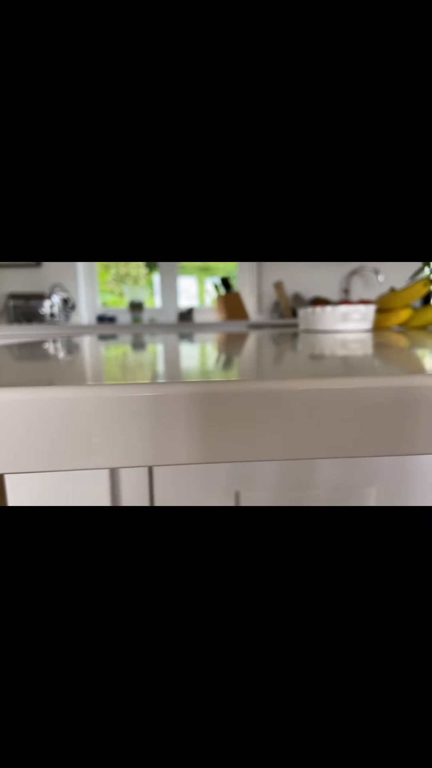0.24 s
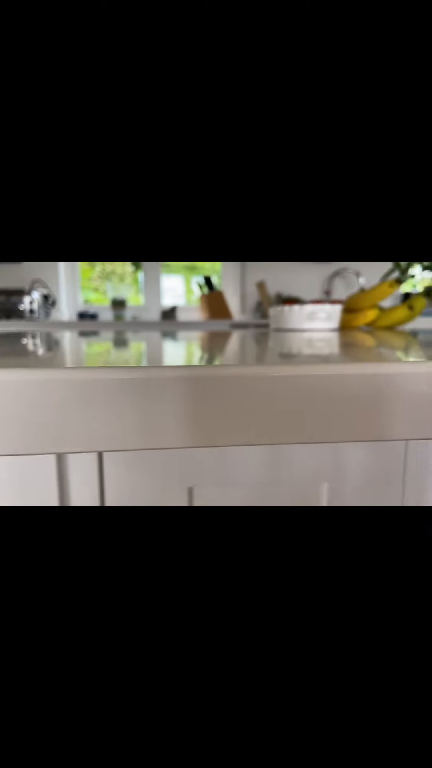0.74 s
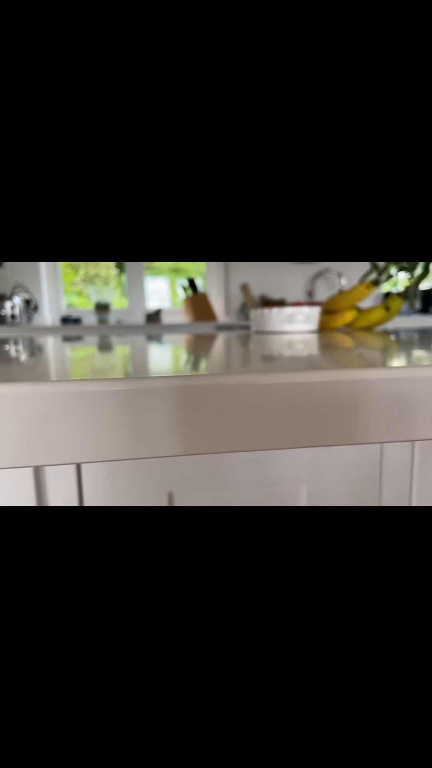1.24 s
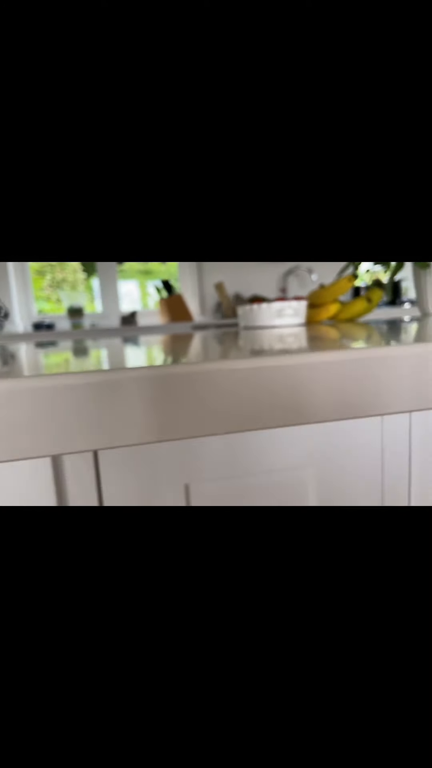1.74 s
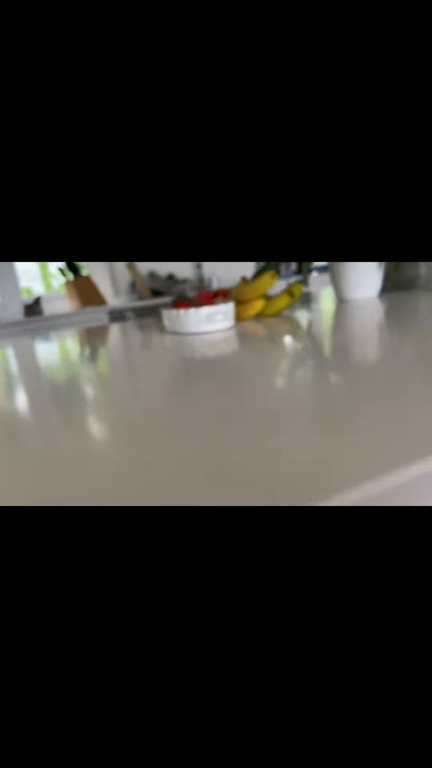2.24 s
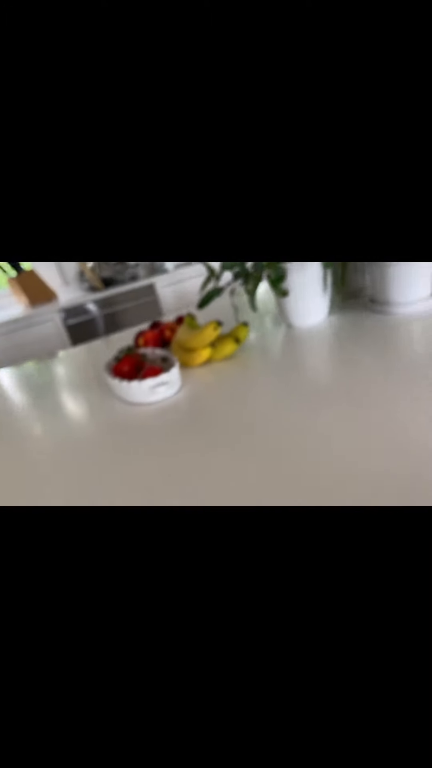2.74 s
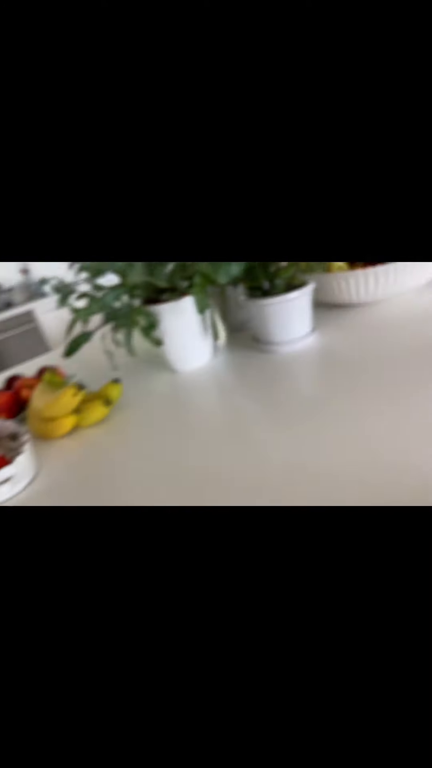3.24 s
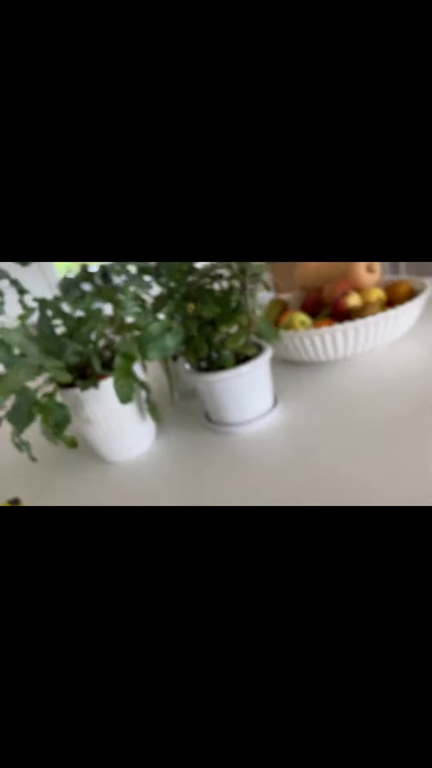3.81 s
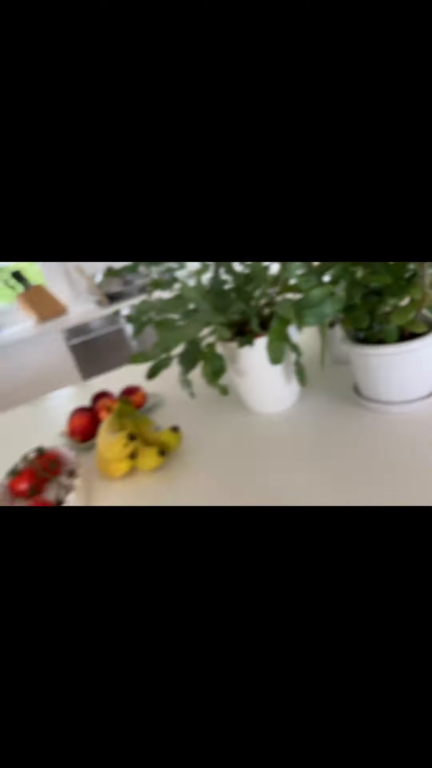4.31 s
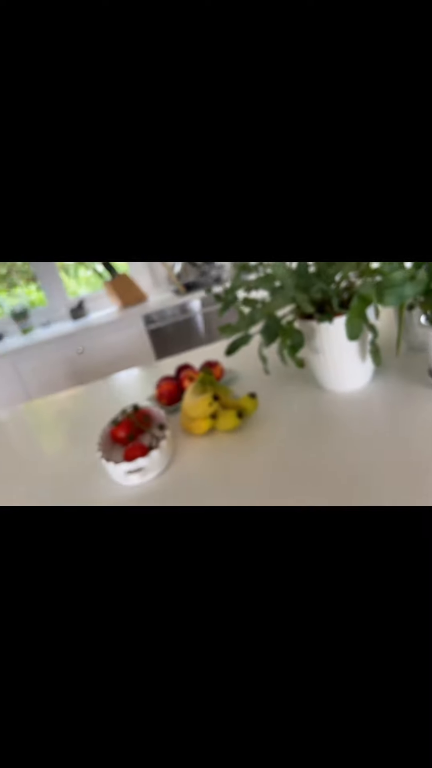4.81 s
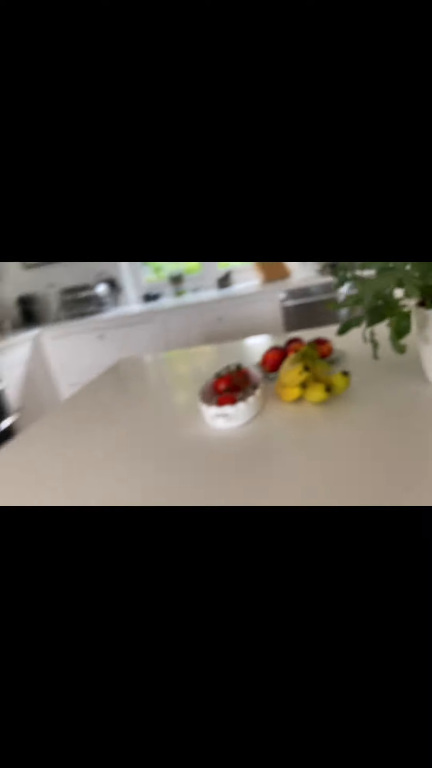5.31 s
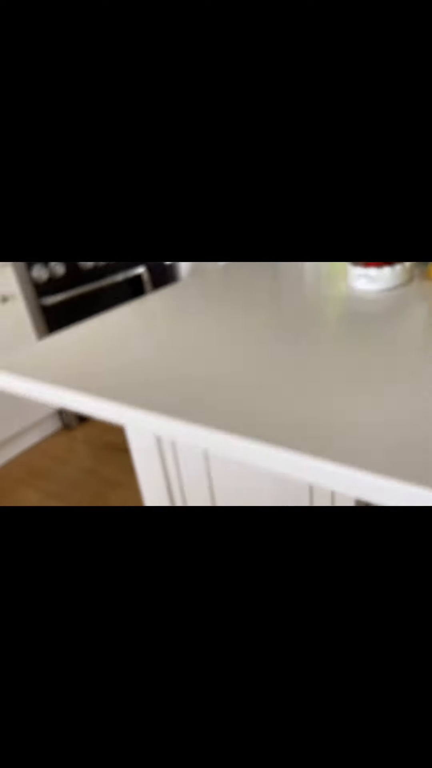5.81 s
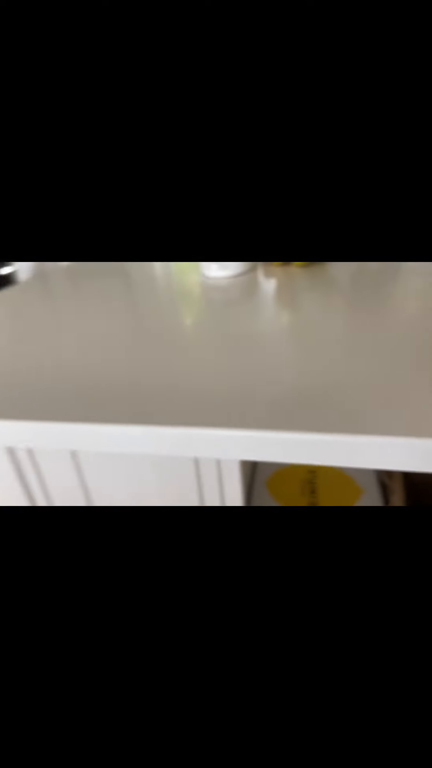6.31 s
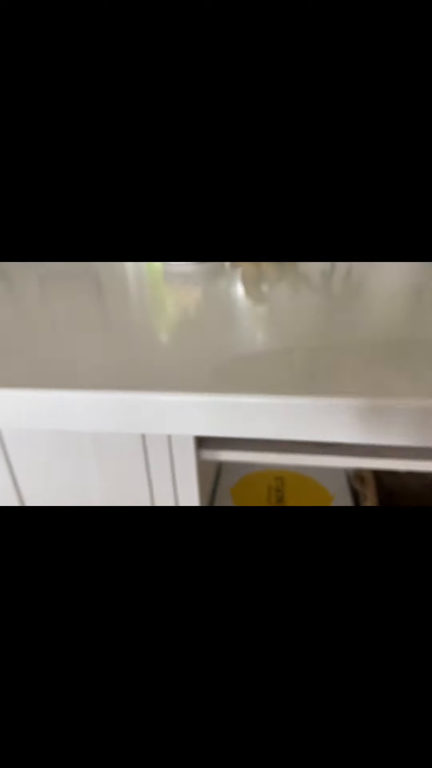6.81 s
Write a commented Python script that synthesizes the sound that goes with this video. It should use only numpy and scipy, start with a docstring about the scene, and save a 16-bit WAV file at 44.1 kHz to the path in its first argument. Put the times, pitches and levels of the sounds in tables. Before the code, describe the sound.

A steady, bright cloth hiss swells over a smooth counter, stops, and gives way to scuffs and a rapid run of hollow clicks. Further wipes are quieter and duller, with scattered wooden thumps ringing below. A light dragging noise leads to a cluster of hard bangs, the loudest moment, then wiping returns. Low rumble and quiet room air lie behind, picked up close on a phone in a reverberant kitchen.

```python
"""A cloth is wiped in long strokes over a stone worktop, close to a hand-held phone in a hard-walled kitchen.
The wipe is noise shaped by cloth, hand and pressure; short scuffs fall around the strokes.
Something small and hollow taps the stone and duller knocks ring the cabinets below: both are decaying
modes, followed by the room's reflections. A cabinet scrape, low rumble and still air lie behind.
The phone's two microphone ports hear the highest treble nearly as one sound, the left port a little late."""
import sys
import numpy as np
from scipy import signal
from scipy.fft import rfft, irfft, next_fast_len
from scipy.io import wavfile
from scipy.ndimage import uniform_filter1d

SR = 44100
rng = np.random.default_rng(int(sys.argv[2]) if len(sys.argv) > 2 else 0)


def store_pcm(level_fs):
    """Save levels as 16-bit WAV."""
    pcm = np.round(np.clip(level_fs, -1, 1) * 32767).astype(np.int16)
    wavfile.write(sys.argv[1], SR, np.atleast_2d(pcm).T)


N = 311331  # samples
HOP, SIZE = 128, 512  # noise frames, samples
HZ = np.fft.rfftfreq(SIZE, 1 / SR)[:, None]
TIMES = np.arange(N // HOP + 5) * HOP / SR
LONG = next_fast_len(N)
BINS = np.fft.rfftfreq(LONG, 1 / SR)

# Colour of the cloth on stone: (frequency [Hz], level per Hz [dB])
CLOTH_COLOUR = [(150, -15), (400, -11.5), (800, -12), (1400, -2), (2200, 3.5), (4500, 0.5), (6000, 0),
                (9000, -7), (12000, -3.5), (16000, -13.5)]
# One table a stroke: (time [s], pressure level [dB], low mids [dB], low treble [dB], top [dB], left-port lag [ms])
STROKES = [
    [(0.0, -42.5, 1.5, -6.5, -7, 0.22), (0.474, -41.5, -1, -4.5, -2, 0.23), (0.9, -41.5, 1, -6.5, -8, 0.24),
     (1.25, -38.5, -4.5, -9, -8, 0.27), (1.44, -38, -10.5, -10.5, -9, 0.3), (1.52, -43, -11, -12, 3, 0.3)],
    [(2.36, -44, 15, -4.5, 0, 0.24), (2.54, -41, 14.5, -6.5, -4, 0.25), (2.6, -44.5, 14.5, -6.5, -6, 0.24),
     (2.706, -39, 9.5, -6, -4, 0.23), (2.924, -46.5, 15, -1, 10, 0.23), (3.546, -48.5, 15.5, 0.5, 11, .23),
     (3.784, -43, 13, -5.5, 4, 0.26), (3.986, -48.5, 13.5, -5.5, 4, 0.3), (4.17, -59, 7.5, -6.5, 5, 0.33)],
    [(4.5, -46, 6.5, -13, -1, 0.33), (4.638, -44, -0.5, -6.5, 5, 0.29), (4.916, -47, -2, -10.5, 7, 0.21),
     (5.1, -51.5, -17, 1, 10, 0.23), (5.344, -49.5, -20, -0.5, 7, 0.33), (5.52, -51, 18, -13, -3, 0.32),
     (5.584, -57.5, 5, -5.5, -2, 0.23), (5.68, -52, -1, -12.5, 6, 0.39), (6.094, -45, 0.5, -7, 0, 0.27),
     (6.17, -47, -3, -7.5, -2, 0.24)],
    [(6.92, -43.5, -11, -10.5, -6, 0.27), (7.04, -39.5, -1, -9.5, -11, 0.28),
     (7.06, -42, 8, -13, -2.5, 0.23)],
]
# How fast each stroke swells in: (rise [dB/s]) for each stroke
LANDING_DB_PER_S = [311, 306, 1500, 310]
LIFT_DB_PER_S = 250  # and how fast it dies away
# How far the hand cups the cloth: (depth [dB]) for each stroke
CUPPING_DB = [4.8, 2.4, 1.3, 3.3]
# Resonances of the air under the hand: (frequency [Hz], width [Hz], share of the cupping [ratio])
HAND_AIR = [(1940, 104, 1.2), (3200, 700, 1.02), (4760, 630, 0.96), (6530, 1070, 0.8), (7830, 440, 0.75),
            (9900, 270, 0.47)]
# Bands of hiss that stand out and glide:
# (start [s], end [s], from [Hz], to [Hz], level [dB], width [octaves])
SWISHES = [(0.203, 1.5, 4850, 3800, 1.5, 0.15), (2.593, 3.188, 4000, 4200, 3.5, 0.19),
           (3.19, 3.997, 4160, 3900, 7, 0.21), (4.06, 4.132, 2800, 3100, 6, .3),
           (4.467, 4.897, 2600, 4700, 3.5, .4)]
# The cloth is set down or shifted: (time [s], level [dB], low mids [dB], low treble [dB], fade [dB/s])
SCUFFS = [(1.535, -44, 15.5, -7, 173), (1.83, -57, 5, -7, 18), (1.875, -59.5, 24, -10, 14),
          (1.911, -42.5, 14.5, -7.5, 118), (2.065, -45.5, 22.5, -9, 200), (2.113, -43, -1, -6.5, 109),
          (2.202, -43.5, 18.5, -16.5, 127), (4.235, -52.5, 23.5, -13.5, 57), (6.281, -63, 17, 7, 134),
          (6.396, -55, 8, 1, 186), (6.491, -47, 22.5, 5.5, 80), (6.653, -54, 39, -1.5, 27)]
SCUFF_RISE_DB_PER_S, SCUFF_TOP_DB = 2000, -7.5
# How far the hiss comes from one direction: (time [s], share [0-1])
FOCUS = [(0.5, 0.04), (0.9, 0.45), (1.1, 0.95), (1.46, 0.95), (1.56, 0.09), (7.06, 0.23)]
LOW_MIDS_HZ, LOW_TREBLE_HZ, TOP_HZ = 487, 2900, 17300  # centres of the parts of the wipe
FIZZ_HZ, FIZZ_DB, FIZZ_GIVES = 10400, 1.24, 0.04  # the fizz sinks as the low treble grows (dB per dB)

# Taps on the stone: (time [s], level [dB], brightness [dB/octave], nominal main ring [Hz], left over right [dB])
TAPS = [(1.053, -43.5, 0.5, 870, 0), (1.263, -46, 3, 920, 0), (1.317, -45, 1, 830, 2),
        (1.535, -31, 5.5, 790, 7), (1.5375, -32.5, -0.5, 890, 3), (1.545, -40.5, -8.5, 850, -2),
        (1.912, -29, 0.5, 760, 9.5), (1.988, -44, 7, 750, 3), (2.056, -38, 7, 756, 9),
        (2.064, -26, -0.5, 720, 6), (2.0685, -28, -2.5, 744, 0), (2.102, -40, 0, 750, 6),
        (2.1095, -28, -2.5, 724, 3), (2.165, -41, 2, 746, 3), (2.2, -31.5, 0, 765, 4),
        (2.327, -33, 0, 750, 3), (2.353, -33, -6, 754, 1), (2.397, -30.5, -2.5, 770, 0),
        (2.415, -37, 1, 880, 2), (2.436, -28.5, -1.5, 790, 2), (2.474, -35, -0.5, 680, -5),
        (2.5, -34, 0, 820, -4), (2.523, -37, -10, 865, -2), (2.544, -35, 0, 750, -3),
        (2.555, -30.5, 0.5, 645, -2), (2.613, -42.5, -2, 690, -2), (2.7364, -30.5, -2.5, 780, -7),
        (4.181, -48, 11, 750, 2), (4.23, -45, -5.5, 980, -2), (4.498, -47.5, 0, 740, 0)]
# Nominal modes of the small hollow thing: (frequency [Hz], level [dB], t60 [s])
HOLLOW_MODES = [(300, -24, 0.055), (765, 6.5, 0.01), (1710, -3, 0.0085), (2400, -4, 0.0094),
                (3160, -16, 0.0083), (4000, -5.5, 0.0073), (5340, -8, 0.0059), (7420, -5, 0.0032),
                (12100, -4, 0.00092)]
# Each contact: its first instant against the rough rest, its smooth push, and cycles a mode takes to build up
TAP_SNAP, TAP_PUSH, TAP_SWELL = 1.75, 1.2, 1.5
KNOCK_SNAP, KNOCK_PUSH, KNOCK_SWELL = 0.9, 0.11, 0.15

# Knocks: (time [s], level [dB], lowest strong mode [Hz], softness corner [Hz], slope between [dB/octave],
#          direct share [dB], ring length [ratio], left over right [dB])
KNOCKS = [(1.055, -54.5, 248, 500, 5, 0, 1.3, 5), (1.322, -54.5, 248, 450, 9, 2, 0.95, 0),
          (1.542, -49, 315, 600, 13, 5, 0.76, 0), (1.556, -45, 389, 606, 10, 1, 1.4, -2),
          (2.201, -42.5, 248, 500, 17, -2, 0.93, 1), (2.342, -40, 248, 450, 30, 0, 0.88, 1),
          (3.044, -37, 236, 1330, 31, 1.5, 1, -1), (3.127, -45.5, 232, 1040, 17, 7.5, 1, 2),
          (3.68, -31, 316, 900, 7, -7, 0.62, -11), (3.688, -31, 500, 1400, 10.5, -4.5, 1, 13),
          (3.775, -34.5, 347, 696, 9, -2, 0.61, 0), (3.781, -50, 107, 300, 13, 8, 0.7, -5),
          (3.798, -37, 167, 500, 7, -1, 0.46, 0), (4.004, -43, 389, 800, 7, -7, 0.74, -8),
          (4.235, -44.5, 400, 1200, 8, -13, 0.67, -6), (4.538, -47.5, 56.3, 147, 10, 11, 0.97, 2),
          (5.116, -38.5, 199, 905, 5.5, -13, 0.72, -10), (5.143, -29, 400, 1400, 6.5, -10, 0.9, -10),
          (5.152, -45, 125, 300, 18, 6, 0.88, -2), (5.255, -31.5, 300, 3320, 2.5, -2, 0.68, 5),
          (5.443, -45, 186, 1298, 6.5, -5, 1.3, 6), (5.516, -45, 394, 724, 9, -1, 0.75, 0),
          (5.53, -39.5, 690, 3500, 1, 1.5, 0.92, 0), (5.863, -48.5, 260, 1340, 5, -4, 0.53, 0),
          (6.054, -41.5, 550, 4000, 19, -2.5, 1.2, 0), (6.0945, -40.5, 530, 6000, 5, 4, 0.86, 5),
          (6.138, -42, 1050, 2500, 13, 4, 0.75, 1), (6.282, -45.5, 3800, 8000, -3, 7.5, 1.3, 8),
          (6.396, -42.5, 570, 5000, 7, 2.5, 1.4, 2), (6.428, -38.5, 700, 5030, 6.5, -0.5, 0.84, 0),
          (6.478, -38, 785, 4000, 5, 2.5, 0.74, -2), (6.485, -30, 389, 4800, 22, 1.5, 1.33, -8),
          (6.5712, -24.5, 389, 1500, 14.5, 2.5, 2.5, -8), (6.581, -34, 158, 350, 15, 7.5, 0.81, 1),
          (6.653, -27, 389, 905, 28, 0.5, 4.2, 3), (6.668, -32.5, 389, 810, 23, 5, 2, -3),
          (6.679, -17, 1200, 6000, 5.5, 4, 1.3, 2.5), (6.683, -27.5, 2400, 6500, 8, 7.5, 1.3, 5),
          (6.687, -31, 2600, 6000, 0, -2, 1.5, 2), (6.688, -28.5, 389, 794, 9.5, 6, 6.6, -7.5)]
# Nominal modes of the cabinets below the worktop: (frequency [Hz], level [dB], usual t60 [s])
CABINET_MODES = [(56, 5.5, 0.051), (79.2, -12.5, 0.051), (107, -5, 0.067), (158, -7.5, 0.13),
                 (248, -3, 0.052), (307, -0.5, 0.049), (389, 9.5, 0.013), (570, 13.5, 0.013),
                 (732, 18, 0.0082), (890, 17, 0.014), (1083, 21, 0.0065), (1150, 10, 0.0031),
                 (1286, 18, 0.0032), (1720, 26.5, 0.0024), (1990, 6, 0.0078), (2650, 19.5, 0.0035),
                 (3170, 0, 0.0031), (3730, 8.5, 0.005), (4700, 12.5, 0.0019), (5600, -12, 0.0021),
                 (6910, -4, .002)]
BELOW_DB = 15  # modes under the lowest strong one sink so many dB per octave
CONTACT_S, CONTACT_AT_HZ, CONTACT_LAW = 0.00082, 1310, 0.45  # contact shortens as the corner rises

# Decay of the hard-walled kitchen: (frequency [Hz], t60 [s])
KITCHEN_DECAY = [(60, 0.71), (250, 0.59), (1000, 0.5), (3000, 0.47), (8000, 0.22), (16000, 0.37)]
TAP_ROOM_DB, KNOCK_ROOM_DB = -8, 1  # share that fills the room

# Something drags in a cabinet: (time [s], level [dB])
SCRAPE_LEVEL = [(6.06, -64), (6.106, -52), (6.23, -52), (6.471, -53)]
# Colour of the drag: (frequency [Hz], level per Hz [dB])
SCRAPE_COLOUR = [(150, 3.5), (400, 6.5), (1000, -2.5), (1450, -1), (1900, -1), (2400, -7.5), (3200, -14),
                 (6000, -41)]
# Low rumble through floor and hand: (time [s], level [dB])
RUMBLE_LEVEL = [(0, -67.5), (1.8, -65.5), (2.4, -57.5), (3.3, -64.5), (4.0, -63), (5.0, -64), (5.75, -65),
                (6.15, -64), (7.06, -52.5)]
# Colour of the rumble: (frequency [Hz], level per Hz [dB])
RUMBLE_COLOUR = [(12, -29), (20, -1.5), (42, -3.5), (64, -1), (92, -3.5), (145, -9), (245, -9), (400, -18),
                 (520, -59), (880, -120)]
# The rumble swells as weight shifts on the floor: (peak time [s], level [dB])
THUDS = [(0.25, -58), (1.551, -56), (2.1, -52), (2.37, -78), (3.13, -50), (3.79, -48), (4.302, -48),
         (4.55, -60), (5.15, -54), (5.51, -51.5), (5.88, -57), (6.495, -46), (6.59, -42), (6.682, -32.5)]
THUD_RISE_DB_PER_S, THUD_FALL_DB_PER_S = 598, 181
# Colour of the still room: (frequency [Hz], level per Hz [dB])
AIR_COLOUR = [(20, -32), (60, -19), (120, -10), (300, -21), (1000, -25.5), (4000, -26), (16000, -31.5)]
AIR_DB = -65

# Likeness of the noise at the two ports: (frequency [Hz], likeness [0-1])
PORT_LIKENESS = [(60, 1), (150, 0.99), (300, 0.18), (1000, 0.073), (2000, 0.36), (3000, 0.19), (4000, 1),
                 (5000, 0.15), (6000, 0.02), (7000, 0.95), (9000, 1)]
# Balance of the two ports: (frequency [Hz], left over right [dB])
PORT_BALANCE = [(60, 0), (150, 0.5), (380, -1), (950, -1), (2380, 2.5), (5980, 0), (15000, -0.5)]
TREBLE_LAG_MS, TREBLE_HZ = 0.2768, 5640  # left-port lag in the treble, and where the treble begins
TAP_LAG_MS, BLOW_LAG_MS = 0.22, 0.077  # left-port lag below it: for the taps, and for the rest, which comes nearly from ahead
EDGE_HZ = 15800  # upper band limit


def cloth():
    """Countless fibres slip on the stone: long strokes under a cupped hand, and short scuffs."""
    s, *columns = np.concatenate(STROKES).T
    *levels_db, lag_ms = (np.interp(TIMES, s, column) for column in columns)
    power = colour(*levels_db) * gain_of(stroke_ends_db() + cupped_hand_db(s) + swishes_db()) ** 2
    power = power + scuffs()
    level_db = unit(CLOTH_COLOUR) + 10 * np.log10(power + 1e-20) + unevenness_db()
    focus = np.interp(TIMES, *np.transpose(FOCUS))
    return noise(level_db, lag_of(HZ, lag_ms), focus)


def colour(pressure_db, low_mids_db, low_treble_db, top_db):
    """Power of the wipe over frequency and time: broad bells and a narrow fizz around the pressure level."""
    db = pressure_db + low_mids_db * near(LOW_MIDS_HZ, 1.575)
    db = db + low_treble_db * near(LOW_TREBLE_HZ, 1.0)
    db = db + top_db * near(TOP_HZ, 0.34)
    fizz_db = FIZZ_DB - FIZZ_GIVES * low_treble_db
    return gain_of(db + fizz_db * near(FIZZ_HZ, 0.043)) ** 2


def stroke_ends_db():
    """Each stroke swells in as the cloth lands and dies away as it lifts."""
    ends_db = [slopes(TIMES, rows[0][0], rows[-1][0], land_db, LIFT_DB_PER_S)
               for rows, land_db in zip(STROKES, LANDING_DB_PER_S)]
    return np.max(ends_db, axis=0)


def cupped_hand_db(s):
    """Air trapped under the hand resonates, as deep as the hand cups the cloth."""
    depth_db = np.repeat(CUPPING_DB, [len(rows) for rows in STROKES])
    resonance = sum(share / (1 + (2 * (HZ - hz) / width_hz) ** 2) for hz, width_hz, share in HAND_AIR)
    return np.interp(TIMES, s, depth_db) * resonance


def swishes_db():
    """A band of the hiss rises, glides in frequency and sinks again."""
    total_db = 0
    for start, end, from_hz, to_hz, db, octaves in SWISHES:
        u = np.clip((TIMES - start) / (end - start), 0, 1)
        arch = np.sqrt(abs(np.sin(np.pi * u)))
        total_db = total_db + db * arch * near(from_hz + (to_hz - from_hz) * u, octaves)
    return total_db


def scuffs():
    """Power of brief slips of the cloth, each with a quick rise and its own fade."""
    power = 0
    for s, db, low_mids_db, low_treble_db, fade_db in SCUFFS:
        envelope = gain_of(slopes(TIMES, s, s, SCUFF_RISE_DB_PER_S, fade_db))
        power = power + colour(db, low_mids_db, low_treble_db, SCUFF_TOP_DB) * envelope ** 2
    return power


def unevenness_db():
    """The hiss varies in slower patches of frequency and time and in a quick, broad flicker."""
    patches, flicker = rng.standard_normal((len(TIMES), len(HZ), 2)).T
    patches = uniform_filter1d(uniform_filter1d(patches, size=6, axis=0), size=20, axis=1)
    flicker = uniform_filter1d(uniform_filter1d(flicker, size=90, axis=0), size=3, axis=1)
    return 1.44 * evened(patches) + 0.67 * evened(flicker)


def taps():
    """A small hollow thing rings as it meets the stone; the grip shifts its main ring."""
    direct, around = np.zeros((2, N)), np.zeros(N)
    hz = np.transpose(HOLLOW_MODES)[0]
    octaves = np.log2(hz / hz[1])
    jolts = rng.standard_normal((len(TAPS), 2000))
    for (s, db, bright_db, pitch_hz, pan_db), jolt in zip(TAPS, jolts):
        modes = np.array(HOLLOW_MODES)
        modes[1, 0] = pitch_hz
        sound, ring = strike(modes, bright_db * octaves, EDGE_HZ, 0.00038, TAP_SNAP, TAP_PUSH, TAP_SWELL, jolt)
        place(direct, s, gain_of(db) * sound, pan_db)
        add(around, s, gain_of(db + TAP_ROOM_DB) * ring)
    return direct, around


def knocks():
    """Each blow favours cabinet modes from its lowest one to a corner; softer contact lowers the corner."""
    direct, around = np.zeros((2, N)), np.zeros(N)
    hz = np.transpose(CABINET_MODES)[0]
    jolts = rng.standard_normal((len(KNOCKS), 2000))
    for row, jolt in zip(KNOCKS, jolts):
        s, db, low_hz, corner_hz, slope_db, direct_db, length, pan_db = row
        octaves = np.log2(hz / low_hz)
        tilt_db = np.where(octaves > 0, -slope_db * octaves, BELOW_DB * octaves)
        modes = np.array(CABINET_MODES)
        length = max(length, .2)
        modes[:, 2] *= np.where(octaves > -.1, length, min(length, 1))  # lower modes never lengthen
        contact_s = CONTACT_S * (CONTACT_AT_HZ / corner_hz) ** CONTACT_LAW
        sound, ring = strike(modes, tilt_db, corner_hz, contact_s, KNOCK_SNAP, KNOCK_PUSH, KNOCK_SWELL, jolt)
        place(direct, s, gain_of(db + direct_db) * sound, pan_db)
        add(around, s, gain_of(db + KNOCK_ROOM_DB) * ring)
    return direct, around


def strike(modes, tilt_db, corner_hz, contact_s, snap, soft, swell, jolt):
    """A rough contact rings detuned modes; gives the near sound and the plain ring that fills the room."""
    t = np.arange(SR // 8) / SR
    hz, db, t60 = np.transpose(modes)[:, :, None]
    hz = hz * (1 + .02 * jolt[-len(hz):, None])
    sign = (-1) ** np.arange(len(hz))[:, None]  # neighbouring modes swing in opposite senses
    decay = gain_of(db + tilt_db[:, None] - 60 * t / t60)
    build_up = 1 - np.exp(-hz * t / swell)
    ring = (sign * decay * build_up * np.sin(2 * np.pi * hz * t)).sum(0)
    ring = signal.sosfilt(signal.butter(4, corner_hz, fs=SR, output="sos"), ring)
    u = t[:len(jolt)] / max(contact_s, 1e-4)
    push = np.minimum(4 * u, 1) * np.exp(-u)
    rough = push * (jolt - np.sum(push * jolt) / np.sum(push))  # roughness adds no net push
    contact = rough / np.linalg.norm(rough) + snap * (u == 0) + soft * push / np.sum(push)
    sound = signal.fftconvolve(ring, contact)
    sound = sound / abs(sound).max()
    return sound, ring * np.linalg.norm(sound) / np.linalg.norm(ring)


def kitchen(x):
    """Dense reflections, each band dying at its own speed; three noise tails fade into one another steadily."""
    turn = 2 * np.pi * 3.7 * np.arange(N) / SR  # so successive blows get different reflections
    t = TIMES[:SR // 2 // HOP]
    decay_db = -60 * t / read(KITCHEN_DECAY, HZ) - 200 * (t < .004)  # reflections start after a gap
    out = 0
    for k in range(3):
        tail = noise(decay_db, lag_of(HZ, BLOW_LAG_MS))
        share = np.sqrt(2 / 3) * np.cos(turn + k * np.pi / 3)
        out = out + signal.fftconvolve((share * x)[None], tail / np.linalg.norm(tail[0]), axes=1)[:, :N]
    return out


def scrape():
    """Uneven slips in a cabinet: a dull hiss broken into grains a few milliseconds long."""
    s, db = np.transpose(SCRAPE_LEVEL)
    grains_db = 3 + 1.8 * rng.standard_normal(len(TIMES))
    level_db = np.interp(TIMES, s, db, left=-140, right=-140)
    return noise(unit(SCRAPE_COLOUR) + level_db + grains_db, lag_of(HZ, BLOW_LAG_MS))


def rumble():
    """Lumpy bass through floor and hand, near alike at both ports, swells with shifts of weight."""
    power = gain_of(np.interp(TIMES, *np.transpose(RUMBLE_LEVEL))) ** 2
    for s, db in THUDS:
        power = power + gain_of(db + slopes(TIMES, s, s, THUD_RISE_DB_PER_S, THUD_FALL_DB_PER_S)) ** 2
    spectrum = rfft(rng.standard_normal((2, LONG))) * gain_of(read(RUMBLE_COLOUR, BINS))
    bass = irfft(spectrum, LONG)[:, :N]
    envelope = np.interp(np.arange(N) / SR, TIMES, np.sqrt(power))
    return evened(bass + 1.8 * bass.mean(0)) * envelope


def room_air():
    """The still air of the room is a faint steady noise."""
    return noise(unit(AIR_COLOUR) + AIR_DB + 0 * TIMES, TREBLE_LAG_MS)


def noise(db, lag_ms, focus=0):
    """Noise at both ports from a dB field over frequency and time; the left port lags."""
    a, b, c, d = rng.standard_normal((db.shape[1], len(HZ), 4)).T
    right, other = a + 1j * b, c + 1j * d
    same = np.clip(1 - (1 - read(PORT_LIKENESS, HZ)) * (1 - focus), 0, 1)
    late = np.exp(-2j * np.pi * HZ * lag_ms / 1000)
    left = same * right * late + np.sqrt(1 - same ** 2) * other
    field = np.array([left, right]) * gain_of(db)
    return signal.istft(field, nperseg=SIZE, noverlap=SIZE - HOP)[1][:, :N]


def lag_of(hz, low_ms):
    """Direction sets the lag of the left port below the treble only."""
    low = 1 / (1 + (hz / TREBLE_HZ) ** 12)
    return low * low_ms + (1 - low) * TREBLE_LAG_MS


def at_ports(x, low_ms):
    """A direct sound reaches the left port late."""
    late = np.exp(-2j * np.pi * BINS * lag_of(BINS, low_ms) / 1000)
    return np.array([irfft(rfft(x[0], LONG) * late, LONG)[:N], x[1]])


def place(mix, s, sound, pan_db):
    """Mixes a sound into both ports, with a level difference between them."""
    add(mix[0], s, gain_of(pan_db / 2) * sound)
    add(mix[1], s, gain_of(-pan_db / 2) * sound)


def add(mix, s, sound):
    """Mixes a sound in at a time."""
    part = mix[round(s * SR):][:len(sound)]
    part += sound[:len(part)]


def slopes(t, first_s, last_s, rise_db, fall_db):
    """Zero dB between two times, sinking by so many dB a second before and after."""
    return -rise_db * np.maximum(first_s - t, 0) - fall_db * np.maximum(t - last_s, 0)


def near(centre_hz, octaves):
    """A bell around a frequency."""
    return np.exp(-.5 * (np.log2((HZ + 1) / centre_hz) / octaves) ** 2)


def unit(points):
    """A spectrum in dB, shifted so that noise with it has rms near 1."""
    db = read(points, HZ)
    return db - 10 * np.log10(np.sum(gain_of(db) ** 2))


def read(points, hz):
    """Reads a spectrum on a log-frequency axis."""
    f, value = np.transpose(points)
    return np.interp(np.log(hz + 1), np.log(f + 1), value)


def evened(x):
    """Scales to rms 1."""
    return x / np.sqrt(np.mean(x ** 2) + 1e-20)


def gain_of(db):
    """Decibels to gain."""
    return 10 ** (np.asarray(db) / 20)


def scene():
    """The cloth close by, blows in the kitchen, then scrape, rumble and air behind."""
    tap, tap_ring = taps()
    knock, knock_ring = knocks()
    blows = at_ports(tap, TAP_LAG_MS) + at_ports(knock, BLOW_LAG_MS)
    reflections = kitchen(tap_ring + knock_ring)
    return cloth() + blows + reflections + scrape() + rumble() + room_air()


def record(dry):
    """The ports differ a little in colour and lose the deepest bass; then the band limit."""
    tilt_db = read(PORT_BALANCE, BINS) / 2
    ports = irfft(rfft(dry, LONG) * gain_of([tilt_db, -tilt_db]), LONG)[:, :N]
    bass_hz = 42
    ports = signal.sosfilt(signal.butter(4, bass_hz, "high", fs=SR, output="sos"), ports)
    band_limit = signal.firwin(511, EDGE_HZ, window=("kaiser", 9), fs=SR)
    return signal.oaconvolve(ports, band_limit[None], "same")


dry = scene()
out = record(dry)
store_pcm(out)
```